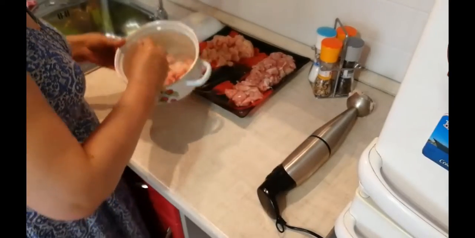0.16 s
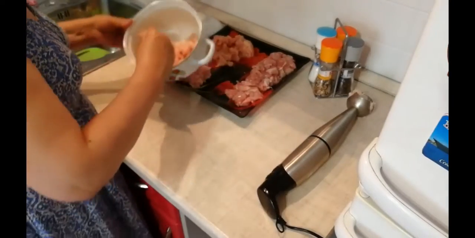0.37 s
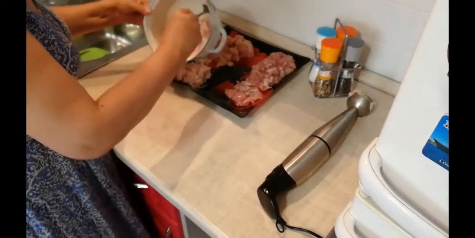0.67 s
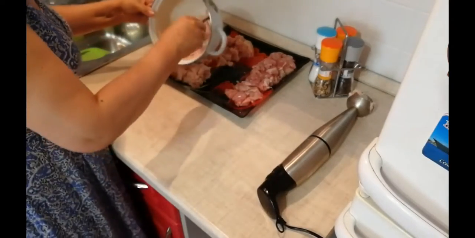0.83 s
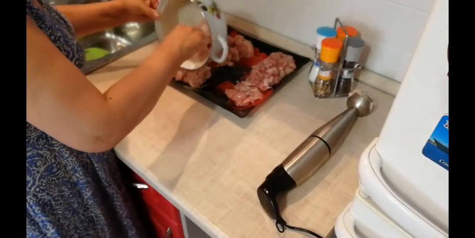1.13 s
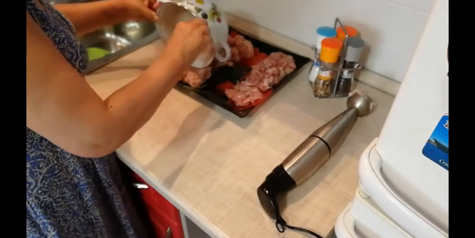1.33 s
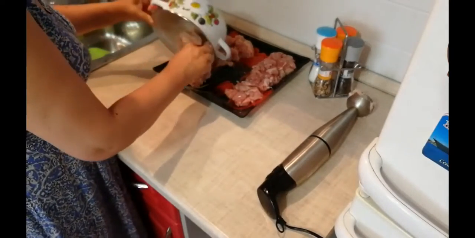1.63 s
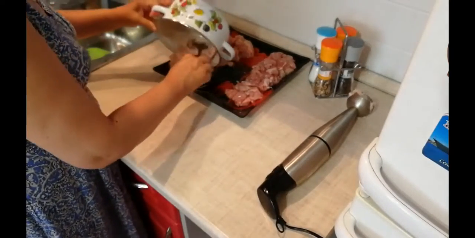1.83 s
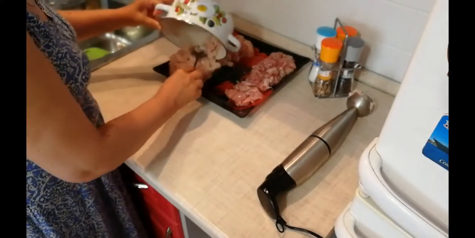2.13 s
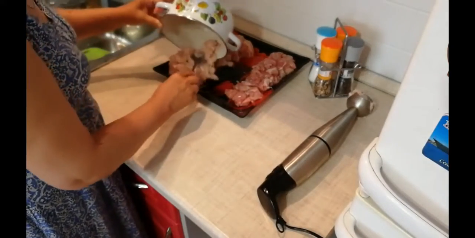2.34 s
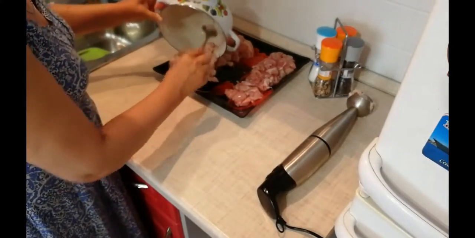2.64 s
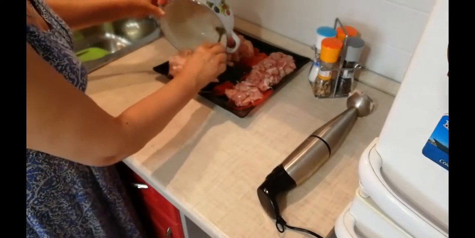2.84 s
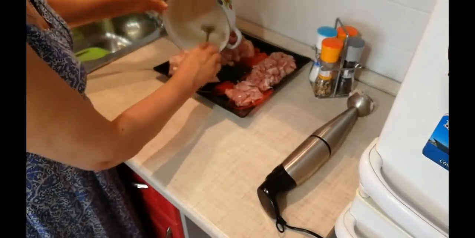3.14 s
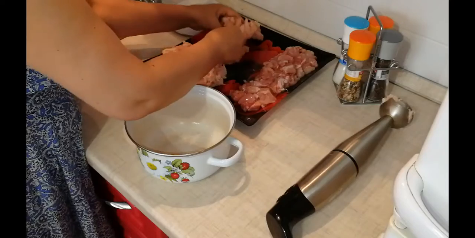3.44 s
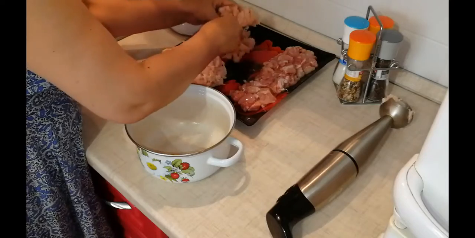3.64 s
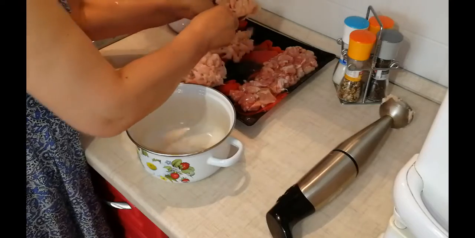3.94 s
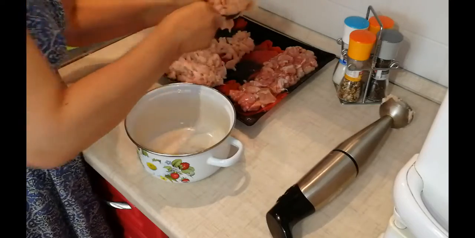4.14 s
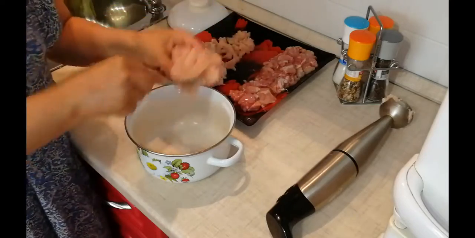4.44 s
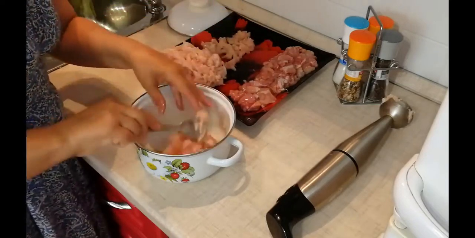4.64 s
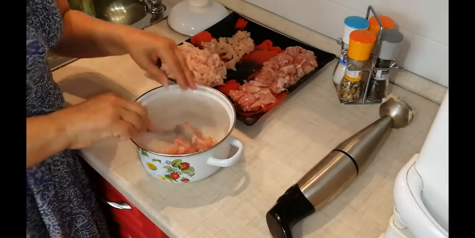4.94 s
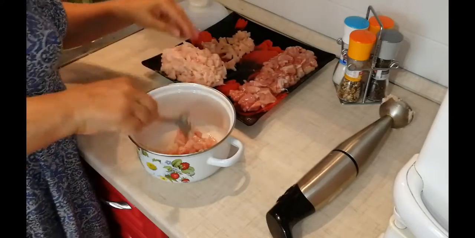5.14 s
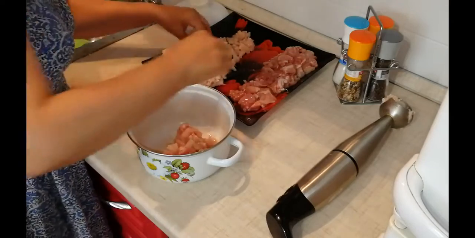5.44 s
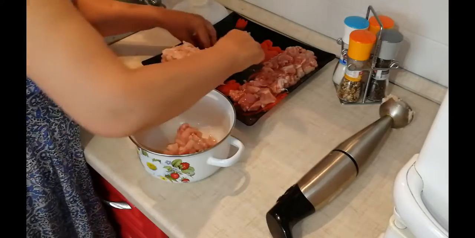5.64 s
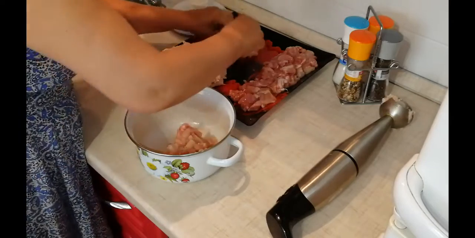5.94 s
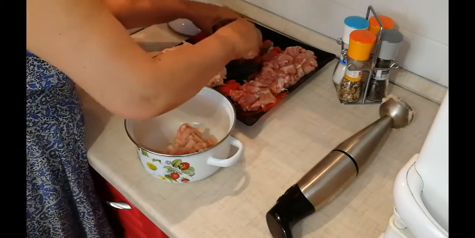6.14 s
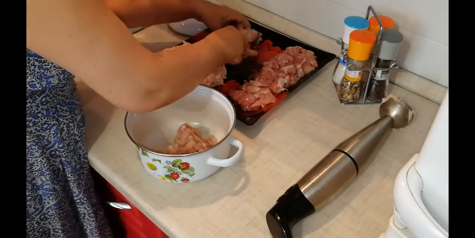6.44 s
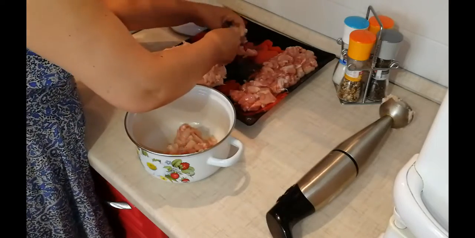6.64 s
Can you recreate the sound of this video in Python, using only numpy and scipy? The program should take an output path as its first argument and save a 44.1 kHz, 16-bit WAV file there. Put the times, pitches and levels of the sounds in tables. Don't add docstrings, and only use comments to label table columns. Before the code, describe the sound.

A spoon knocks sharply on an enamel pot and scrapes out sticky minced meat; after a brief silence, soft wet peeling and tray taps follow.

```python
import sys
import numpy as np
from scipy import signal
from scipy.fft import rfft, irfft, next_fast_len
from scipy.io import wavfile
from scipy.ndimage import uniform_filter1d

SR = 44100
rng = np.random.default_rng(int(sys.argv[2]) if len(sys.argv) > 2 else 0)


def natural_amplitude(level_db):
    exponent = np.asarray(level_db, float) / 20
    return 10 ** exponent


def digitize_waveform(pressure):
    field = np.atleast_2d(pressure).T
    bounded = np.clip(field, -1, 1)
    quanta = np.round(bounded * 32767).astype(np.int16)
    wavfile.write(sys.argv[1], SR, quanta)


N = 299439

SILENCE_S = 3.3415, 3.6065

# t/s, peak level/dB, crack length/ms, room share/dB, snap share/dB, snap pitch f/Hz
SPOON_BLOWS = [
    (0.22, -8, 2.6, -5, -38, 3430),
    (0.77, 4, 1.44, -1.5, -7, 7350),
    (1.464, 4, 1.03, -2.5, -5.5, 7730),
    (2.853, 3, 4.1, -5, -31, 9100),
    (4.7269, -18, 9.3, -3, -7, 9700),
    (4.74, -10.5, 5.8, -7.5, -36, 9720),
    (5.832, 7.5, 1.66, -6, -17, 2890),
    (6.3696, 0, 2.3, -7, -32, 3300),
]


def evened(x):
    return x / np.sqrt(np.mean(x ** 2) + 1e-20)


def read(points, hz):
    f, value = np.transpose(points)
    return np.interp(np.log(hz + 1), np.log(f + 1), value)


def add(mix, s, sound):
    part = mix[..., round(s * SR):][..., :sound.shape[-1]]
    part += sound[..., :part.shape[-1]]


def colour(x, tone, rings=(), ring_db=0, damping=1):
    taps = 4096
    hz = np.fft.rfftfreq(taps * 2, 1 / SR)
    peaks = 0
    for f, width, db in rings:
        below = np.minimum(hz / f, 1) ** 2
        peaks = peaks + natural_amplitude(db + ring_db) * below / (1 + (2 * (hz - f) / (width * damping)) ** 2)
    cepstrum = irfft(np.log(natural_amplitude(read(tone, hz)) + peaks + 1e-5))
    cepstrum[1:taps] *= 2
    cepstrum[taps + 1:] = 0
    return signal.oaconvolve(x, irfft(np.exp(rfft(cepstrum)))[:taps])


def resonate(x, hz, width):
    turn = np.exp(2j * np.pi * np.cumsum(hz * np.ones(len(x))) / SR)
    r = np.exp(-np.pi * width / SR)
    return 2 * (turn * signal.lfilter([1 - r], [1, -r], x / turn + 1e-18)).real


def resonate_twice(x, hz, width):
    return resonate(resonate(x, hz, width), hz, width)


def gritty(count, grain_db, lump_db):
    slips = rng.standard_normal(count) * natural_amplitude(grain_db * np.minimum(rng.exponential(1, count), 5))
    lumps = evened(uniform_filter1d(rng.standard_normal(count), size=300))
    return evened(slips * natural_amplitude(lump_db * lumps))


def gesture(s, hold, rise_db_per_s, fall_db_per_s):
    lead = 40 / rise_db_per_s
    t = np.arange(-lead, hold + 40 / fall_db_per_s, 1 / SR)
    return s - lead, natural_amplitude(rise_db_per_s * np.minimum(t, 0) - fall_db_per_s * np.maximum(t - hold, 0))


def patchy(x, patch_db):
    z = signal.stft(x, nperseg=256)[2]
    patches = uniform_filter1d(rng.standard_normal(z.shape), size=5, axis=0)
    patches = uniform_filter1d(patches, size=7, axis=1)
    return signal.istft(z * natural_amplitude(patch_db * evened(patches)), nperseg=256)[1][:N]


def alike(pair, same):
    size = next_fast_len(pair.shape[1])
    c = np.clip(read(same, np.fft.rfftfreq(size, 1 / SR)), -.99, .99)
    a, b = rfft(pair, size)
    up, down = np.sqrt((1 + c) / 2), np.sqrt((1 - c) / 2)
    return irfft(np.array([up * a + down * b, up * a - down * b]), size)[:, :pair.shape[1]]


def paths():
    # f/Hz, t60/s
    kitchen_t60 = [(250, 0.31), (660, 0.42), (1740, 0.34), (4590, 0.41), (12100, 0.31)]
    # f/Hz, likeness [-1..1]
    ear_likeness = [(200, 0.22), (700, 0.13), (1500, 0.41), (3000, 0.097), (6000, 0.087), (14000, 0.93)]
    echo_db, echo_rise_s = -4.5, .009

    near = np.zeros((2, 600))
    near[[0, 1], [0, 17]] = 1
    at = np.geomspace(40, 550, 7).astype(int) + rng.integers(0, 40, (2, 7))
    echoes = rng.choice([-1., 1.], at.shape) * natural_amplitude(echo_db - 700 * at / SR)
    np.put_along_axis(near, at, echoes, 1)

    hz, t, z = signal.stft(rng.standard_normal((2, SR // 2)), SR, nperseg=256)
    decay = natural_amplitude(-60 * t / read(kitchen_t60, hz)[:, None])
    tail = signal.istft(z * decay, SR, nperseg=256)[1]
    tail *= np.clip(np.arange(tail.shape[1]) / (echo_rise_s * SR), 0, 1)
    return [alike(p / np.linalg.norm(p[0]), ear_likeness) for p in (near, tail)]


def hum():
    # f/Hz, level/dB per Hz
    hum_tones = [
        [(12, -40.5), (33, 1.5), (65, -11.5), (111, -8), (156, -5.5), (224, -11.5), (599, -22), (1020, -17.5),
         (2370, -21.5), (3330, -19.5), (6170, -21), (8890, -22), (10200, -23), (14300, -24), (16500, -80)],
        [(12, -33.5), (20, 4), (71, -10), (121, -5), (189, -12.5), (224, -8.5), (297, -13.5), (535, -23),
         (994, -17), (2370, -23), (9150, -26), (9950, -26.5), (12800, -26), (15200, -32), (16500, -81)],
    ]
    hum_levels = [-58.5, -57]
    # f/Hz, likeness [-1..1]
    hum_likeness = [(60, .97), (180, .86), (350, .45), (600, -.1), (950, -0.18), (2380, -0.09), (5980, 0),
                    (15000, -0.3)]
    out, cut = np.zeros((2, N)), round(np.mean(SILENCE_S) * SR)
    for tone, db, part in zip(hum_tones, hum_levels, (slice(0, cut), slice(cut, N))):
        noise = np.array([colour(rng.standard_normal(N), tone)[part] for _ in "LR"])
        out[:, part] = natural_amplitude(db + 0.5) * evened(noise)
    drift = evened(uniform_filter1d(rng.standard_normal(N), size=6000))
    return alike(out, hum_likeness) * natural_amplitude(0.2 * drift)


def drones():
    # f/Hz, width/Hz, rms level/dB
    fridge_tones = [(36, 23, -73.5), (97.36, 4.9, -70), (234, 12, -77.5), (294, 5.1, -79),
                    (12700, 80, -83.5)]
    # t/s, hold/s, level/dB, f/Hz
    far_motor = [
        (3.71, 0.31, -62.5, 184.4),
        (4.22, 0.15, -63, 186.4),
    ]
    out = np.zeros(N)
    for f, width, db in fridge_tones:
        out += natural_amplitude(db) * evened(resonate_twice(rng.standard_normal(N), f, width))
    air = rng.standard_normal(N)
    for s, hold, db, hz in far_motor:
        start, gain = gesture(s, hold, 210, 106)
        tone = evened(resonate(resonate(air, hz, 7.0), hz, 7.5))
        add(out, start, natural_amplitude(db) * gain * tone[round(start * SR):][:len(gain)])
    return out


def pops(rows, cycles, width, gain_db):
    out, t = np.zeros(N), np.arange(SR // 30) / SR
    for s, db, hz in rows:
        puff = rng.standard_normal(len(t)) * np.exp(-t * hz / cycles)
        pop = resonate_twice(puff, hz, width * hz)
        add(out, s, natural_amplitude(db + gain_db) * pop / abs(pop).max())
    return out


def sticky_ticks():
    # t/s, peak level/dB, f/Hz
    tick_rows = [(0.0845, -49, 8450), (0.217, -7, 9200), (0.5077, -33, 9150), (1.261, -36.5, 9300),
                 (1.2875, -28, 8780), (1.291, -25, 9120), (1.3143, -29.5, 8660), (1.3572, -43, 8490),
                 (1.3686, -31.5, 9050), (1.373, -35, 9300), (1.3957, -39, 7250), (1.6557, -25, 8800),
                 (2.0222, -40, 6200), (2.3287, -49, 8500), (2.4159, -48, 8370), (2.6869, -30, 8000),
                 (3.0074, -16, 8800), (3.042, -30, 8400), (3.2493, -36, 8650), (3.8965, -41, 9500),
                 (4.138, -44, 9250), (2.57, -56.5, 4500)]
    return pops(tick_rows, cycles=14.0, width=.24, gain_db=0.67)


def blows():
    # f/Hz, level/dB per Hz
    pot_tones = [
        [(200, -30), (373, -4.5), (579, -33), (763, -7), (1140, -43), (1400, 5.5), (1840, -23), (9930, -11)],
        [(200, -23), (373, -7), (519, -43), (683, -21.5), (950, -28), (1480, 0.5), (1910, -17), (9930, -9.5)],
        [(200, -53), (400, -33), (690, -5), (1000, -26.5), (1400, -7), (1870, -15.5), (5330, -20), (10500, -18)],
        [(200, -27), (311, -14), (509, -40.5), (735, -37), (1250, -5.5), (1480, -2.5), (1810, -19.5),
         (8740, -4)],
    ]
    # f/Hz, level/dB per Hz
    tray_tones = [
        [(200, -39.5), (836, -9.5), (1530, -13.5), (3490, -19.5), (4200, -7), (6880, -11), (9580, -9)],
        [(200, 3), (316, -42), (456, -47), (883, -15), (1350, -6.5), (2750, -13), (9060, 2.5), (14100, -6)],
        [(200, -21.5), (387, -6.5), (500, -21.5), (569, -10), (1100, -1), (1740, -2.5), (3690, -4.5),
         (9930, -13)],
        [(200, -7), (316, -5.5), (360, -25.5), (601, 0), (1420, 0), (1980, -6), (3130, -1), (6400, -3)],
    ]
    # f/Hz, width/Hz, level/dB
    pot_modes = [
        [(795, 55, -4), (1500, 28, -13), (2140, 79, -13.5), (3160, 44, -6), (3300, 75, 3), (4190, 97, -19),
         (5440, 92, 3), (6730, 89, -2), (6840, 77, -6), (6820, 46, -23), (8050, 79, -0.5), (8560, 90, -19),
         (9900, 120, -19), (11400, 90, -11)],
        [(749, 120, -6.5), (1520, 50, -9), (2154, 65, 2), (2880, 36, -16), (3490, 60, -4.5), (4300, 120, -16),
         (4960, 40, -1), (5630, 62, 1), (6350, 190, -4.5), (8200, 46, -15.5), (8490, 34, -12), (8870, 40, 0.5),
         (10330, 64, 2), (10900, 52, -13.5)],
        [(639, 140, -5.5), (790, 150, 0), (1110, 42, -15.5), (1450, 100, -3), (2350, 63, -17.5),
         (2890, 28, -6.5), (3940, 150, -11), (4660, 60, -16.5), (6640, 65, -10.5), (6894, 250, -11),
         (8330, 150, -11), (9300, 46, -12.5), (10550, 100, -19), (10900, 110, -15)],
        [(760, 71, -3), (1479, 32, 7.5), (2260, 110, -9.5), (2990, 82, -3.5), (3620, 98, -2), (4300, 50, -9),
         (4770, 110, -5), (6160, 64, -17), (6800, 66, -3.5), (6870, 88.8, -11.5), (8140, 22, -15.5),
         (8800, 59, -6), (9150, 82, -10), (10330, 110, -3.5)],
    ]
    # f/Hz, width/Hz, level/dB
    tray_modes = [
        [(893, 67, -8), (8970, 220, 6.5)],
        [(1280, 68, -9), (5440, 250, 6), (6140, 370, -3), (9720, 44, 10)],
        [(1145, 31, -7), (1385, 110, -4), (1770, 32, -9), (2210, 100, -5.5), (2540, 49, -1), (2770, 41, 0),
         (3200, 79, -18.5), (3740, 190, -3), (5110, 100, -14.5), (6500, 130, -8.5), (8200, 89, -10),
         (8640, 110, -9)],
        [(930, 59, -1.5), (1470, 60, -3), (2540, 28, -1), (3200, 340, 1), (4520, 160, -14), (5000, 54, -20),
         (6270, 55, 1), (6950, 39, 0), (7700, 52, -11), (8350, 56, -4.5), (9630, 150, -2)],
    ]
    bass_hz, bass_db, top_hz, top_db = 95, -33.5, 17100, -16
    blur_hz = 3000
    hand_damping, hand_hold_s = 1.4, .012
    crack_rise_s = .0006
    swell_s, swell_db = .007, -48

    out, t = np.zeros((2, N)), np.arange(SR // 40) / SR
    rows = zip(SPOON_BLOWS, pot_tones + tray_tones, pot_modes + tray_modes)
    for (s, db, crack_ms, room_db, snap_db, snap_hz), tone, rings in rows:
        tone = [(bass_hz, tone[0][1] + bass_db), *tone, (top_hz, tone[-1][1] + top_db)]
        near, tail = paths()
        crack = rng.standard_normal(len(t)) * np.exp(-t / (crack_ms * 0.0014))
        crack *= np.clip(t / crack_rise_s, 0, 1)
        lumps = np.sqrt(uniform_filter1d(abs(rfft(crack)) ** 2, size=3))
        crack = irfft(rfft(crack) / lumps, len(t))

        ring = colour(crack, tone, rings, ring_db=7.0, damping=hand_damping)
        close = ring * np.exp(-np.arange(len(ring)) / (hand_hold_s * SR))
        close = close / abs(close).max()
        snap = resonate_twice(crack, snap_hz, 0.19 * snap_hz)
        snap = np.diff(snap, 2, prepend=[0, 0])
        add(close, 0, natural_amplitude(snap_db) * snap / abs(snap).max())
        add(out, s, natural_amplitude(db) * signal.fftconvolve(close[None], near, axes=1))

        lead = round(swell_s * SR)
        swell = evened(close[lead:0:-1]) * np.linspace(.3, 1, lead)
        add(out, s - swell_s, natural_amplitude(db + swell_db) * swell)

        blurred = []
        for f, width, mode_db in rings:
            blur = max(f / blur_hz, 1)
            blurred.append((f, width * blur, mode_db - 10 * np.log10(blur)))
        far = colour(crack, tone, blurred)
        add(out, s, natural_amplitude(db + room_db) * signal.fftconvolve(far[None] / abs(far).max(), tail, axes=1))
    return out


def smacks():
    # t/s, peak level/dB, f/Hz
    smack_rows = [(0.2245, -18, 3730), (1.0919, -35, 1240), (1.6807, -31, 3200), (2.0241, -55, 2540),
                  (2.1288, -50, 1200), (2.1831, -52, 1550), (2.687, -38, 4430), (3.25, -32, 4920),
                  (0.465, -38, 4300), (0.516, -43, 2600), (4.6054, -51.5, 1235), (4.6595, -42, 3670),
                  (4.943, -42, 1860), (4.886, -57, 1100), (4.961, -52, 2200), (4.779, -50, 900),
                  (4.907, -51, 700), (5.4943, -51, 1280), (5.5245, -51.5, 1570), (5.7313, -59.5, 1543),
                  (6.042, -30.5, 5700), (6.343, -44, 790), (6.351, -37, 760), (6.7345, -43, 3480),
                  (6.759, -36.5, 4300), (6.7793, -41, 1630)]
    return pops(smack_rows, cycles=3, width=.4, gain_db=1.3)


def glints():
    # t/s, hold/s, level/dB, f/Hz, glide/Hz per s
    glint_rows = [(0.25, 0.027, -45, 3300, -1200), (0.33, .03, -51, 2980, -600),
                  (0.25, 0.037, -43, 1390, -50), (0.33, 0.032, -37, 1405, 100), (0.36, .05, -55, 2120, 300),
                  (1.062, 0.028, -44, 2900, -300), (1.092, 0.0065, -31.5, 1386, -100),
                  (1.11, 0.024, -47, 3790, 100), (1.12, 0.017, -46, 2890, 100),
                  (2.895, 0.028, -34, 3700, 300), (2.995, 0.018, -48, 2170, -200),
                  (3.005, .012, -49, 3400, -100), (3.06, 0.011, -43, 3130, -600),
                  (3.086, .01, -40, 3350, -100), (3.113, .02, -39, 2640, 100),
                  (3.12, 0.023, -47, 3000, -400), (4.775, .012, -61, 904, -100),
                  (1.635, 0.016, -44, 592, -100)]
    width_hz = 90
    out = np.zeros(N)
    for s, hold, db, hz, glide in glint_rows:
        slips = rng.standard_normal(SR // 4)
        start, gain = gesture(s, hold, rise_db_per_s=1198.5, fall_db_per_s=900)
        hz = hz + glide * (np.arange(len(slips)) / SR + start - s)
        tone = evened(resonate_twice(slips, hz, width_hz))[:len(gain)]
        add(out, start, natural_amplitude(db) * gain[:len(tone)] * tone)
    return out


def scrapes():
    # t/s, hold/s, pressure/dB, air share/dB, air pitch f/Hz
    hold_strokes = [
        [(0.345, 0.014, -42, 0.5, 1363), (0.392, 0.0088, -38, -3, 1406), (0.47, 0.047, -54.5, -1, 1470)],
        [(1.035, 0.0063, -43, -11, 1350), (1.06, 0.016, -38.5, 1, 1343), (1.095, 0.055, -37, -7, 1349)],
        [(1.72, 0.023, -52.5, -5.5, 1530), (1.77, 0.09, -63, 2.5, 1570), (1.87, 0.099, -62, 2, 1616)],
        [(2.015, 0.042, -53, -13.5, 1470), (2.14, 0.069, -61.5, -12.5, 1520)],
        [(2.93, 0.056, -42, -13, 1273), (3.0, 0.0088, -38.5, -2, 1415)],
        [(3.056, 0.0072, -31.5, -2.5, 1450), (3.088, 0.011, -34, -6, 1500)],
        [(3.112, 0.027, -32, 1.5, 1495), (3.148, 0.013, -38, 1, 1504), (3.19, 0.028, -39, -16, 1490)],
        [(3.6, 0.075, -75.5, -3, 1557)],
    ]
    # lower air mode/dB, wall rattle/dB, lower over upper pitch [ratio], glide/Hz per s, air width/Hz
    pot_holds = [
        (-7.5, -5.5, .52, -150, 100),
        (-7, -3, 0.53, -200, 150),
        (-6.5, -1, 0.392, 700, 220),
        (-14.5, 4, 0.556, -300, 160),
        (-9.5, -0.5, .52, 94.5, 110),
        (-26, -9.5, 0.535, 300, 210),
        (-29, -5.5, 0.554, -100, 80),
        (14.5, -14, 0.547, 5, 125),
    ]
    # f/Hz, width/Hz, level/dB
    wall_modes = [
        [(2180, 58, -0.5), (2910, 64, -2.5), (3800, 120, -5)],
        [(2900, 170, -9.5), (3670, 60, -7), (4400, 47, -2), (6300, 45, -17)],
        [(1150, 60, -8), (2620, 81, -7), (5040, 34, 3.5), (6100, 100, 4)],
        [(1220, 53, 2), (2530, 56, 3), (3150, 51, -2), (6670, 39, 2)],
        [(2160, 40, 11.5), (3320, 71, -2.5), (3760, 36, -3), (4240, 40, -1)],
        [(2230, 37, -1), (3130, 110, 10), (3350, 74, 7), (4530, 45, -1)],
        [(2640, 130, 2.5), (2970, 170, 6.5), (3530, 46, -14), (4230, 67, -4)],
        [(3030, 70, -2.5)],
    ]
    # f/Hz, level/dB per Hz
    rasp_tone = [(2350, -40.5), (4000, -2), (5290, -8.5), (8910, 4.5), (11400, -6.5), (13900, -9.5),
                 (15700, -17), (16200, -22), (16500, -75.5)]
    wall_tone = [(1500, -45.5), (2000, -4.0), (4500, -3.0), (6000, -42.5)]  # f/Hz, level/dB per Hz

    out, slips = np.zeros(N), gritty(N, grain_db=3.0, lump_db=0.5)
    tilt = 1 + .025 * evened(uniform_filter1d(rng.standard_normal(N), size=900))
    rasp = evened(colour(slips, rasp_tone)[:N])
    for strokes, pot_hold, modes in zip(hold_strokes, pot_holds, wall_modes):
        lower_db, wall_db, lower_ratio, glide, width_hz = pot_hold
        walls = evened(colour(slips, wall_tone, modes, damping=1.6))
        for s, hold, db, air_db, hz in strokes:
            start, gain = gesture(s, hold, rise_db_per_s=548.5, fall_db_per_s=749.5)
            first = round(start * SR)
            part = slice(first, first + len(gain))
            hz = (hz + glide * (np.arange(len(gain)) / SR + start - s)) * tilt[part]
            upper = resonate_twice(slips[part], hz, width_hz)
            lower = resonate(resonate(slips[part], hz * lower_ratio, 120), hz * lower_ratio, 130)
            air = natural_amplitude(air_db) * evened(upper) + natural_amplitude(lower_db) * evened(lower)
            rattle = natural_amplitude(wall_db + .5 * air_db) * walls[part]
            add(out, start, natural_amplitude(db) * gain * (rasp[part] + air + rattle))
    return out


def clicks():
    # t/s, peak level/dB, f/Hz
    click_rows = [(0.511, -40, 11000), (1.261, -39, 8970), (3.252, -40, 5000), (4.732, -32, 2500),
                  (4.7415, -33, 6000), (4.944, -48, 1980), (4.947, -43, 2400), (4.952, -45, 2080),
                  (4.962, -41, 2500), (4.976, -41, 1700), (5.007, -49, 2800), (6.305, -48, 4500),
                  (6.611, -46, 2970), (4.899, -45, 190), (4.906, -45, 260)]
    out, impulse = np.zeros(N), np.eye(1, 900)[0]
    for s, db, hz in click_rows:
        click = -resonate_twice(impulse, hz, 1.2 * hz)
        add(out, s, natural_amplitude(db) * click / abs(click).max())
    return out


def peels():
    # t/s, hold/s, hiss level/dB, squelch share/dB
    peel_rows = [(1.3, 0.012, -50.5, -8), (1.378, 0.012, -53, -28), (2.689, 0.0066, -54.5, -11.5),
                 (3.899, 0.011, -63, -23), (3.95, 0.044, -53, -26), (4.15, 0.1, -45.5, -16.5),
                 (4.253, 0.082, -50, -14), (4.4, 0.057, -63.5, -11.5), (4.754, 0.013, -49, -1.5),
                 (4.892, 0.052, -57, -9), (5.055, 0.07, -61.5, -6), (5.926, .03, -75, 7),
                 (6.02, 0.016, -56, -17), (6.47, 0.029, -53, -2), (6.591, 0.058, -57, 5.5),
                 (6.742, 0.034, -59, 2)]
    # f/Hz, level/dB per Hz
    hiss_tone = [(2350, -34), (4000, -21.5), (5850, -9), (6740, -12.5), (9230, 1.5), (10500, -6.5),
                 (15300, -14), (16200, -30), (16500, -51)]
    # f/Hz, level/dB per Hz
    squelch_tone = [(350, -41), (600, -5.5), (1000, -2), (1920, -8.5), (3200, 3.5), (7000, -9.5),
                    (9100, -39), (15400, -120)]
    hiss, squelch = np.zeros((2, N))
    for s, hold, db, squelch_db in peel_rows:
        start, gain = gesture(s, hold, rise_db_per_s=355, fall_db_per_s=259.5)
        add(hiss, start, natural_amplitude(2 * db) * gain ** 2)
        add(squelch, start, natural_amplitude(2 * (db + squelch_db)) * gain ** 2)
    tears = gritty(N, grain_db=3.0, lump_db=1.0)
    fine = np.sqrt(hiss) * evened(colour(tears, hiss_tone)[:N])
    return fine + np.sqrt(squelch) * evened(colour(tears, squelch_tone)[:N])


def thuds():
    # t/s, peak level/dB, f/Hz
    thud_rows = [
        (3.608, -50, 266),
        (3.629, -47, 282.6),
        (4.224, -55, 245),
        (4.799, -55, 189.5),
        (5.885, -52, 180),
        (6.304, -38.5, 2800),
    ]
    return pops(thud_rows, cycles=3.8, width=3.3, gain_db=0.49)


def shaded(pair):
    # f/Hz, level/dB, left over right/dB
    treble_shade = [(3040, 0.9, 0.6), (4830, -0.17, 3), (5400, -6.5, 7.5), (6000, 0, 2), (8000, -2.37, 4.5),
                    (11800, 1, -2.2)]
    out = []
    for x, side in zip(pair, (1, -1)):
        tone = [(f, db + side * lean_db / 2) for f, db, lean_db in treble_shade]
        out.append(colour(x, tone)[:N])
    return np.array(out)


def hush(quiet):
    hush_s, hush_db = .014, -20.0
    gain_db = np.zeros(N)
    for s, *_ in SPOON_BLOWS[:1] + SPOON_BLOWS[2:4] + SPOON_BLOWS[6:]:
        add(gain_db, s - hush_s - .005, np.full(round(hush_s * SR), hush_db))
    bass = signal.sosfiltfilt(signal.butter(2, 600, fs=SR, output="sos"), quiet)
    treble = (quiet - bass) * natural_amplitude(uniform_filter1d(gain_db, size=90))
    band = signal.sosfiltfilt(signal.butter(3, (300, 460), "bandpass", fs=SR, output="sos"), quiet)
    t = np.arange(N) / SR
    masked = uniform_filter1d(1. * (t > 3.06) * (t < 3.19), size=3000)
    return bass + treble - masked * band


def scene():
    near, tail = paths()
    room = hum() + drones()
    hits, ticks = blows(), clicks()
    soft = sticky_ticks() + smacks() + glints() + thuds()
    soft += patchy(scrapes(), patch_db=3.5)
    soft += patchy(peels(), patch_db=-1.0)
    heard = signal.fftconvolve(soft[None], near, axes=1)[:, :N] + ticks
    heard += natural_amplitude(-7.5) * signal.fftconvolve((soft + ticks)[None], tail, axes=1)[:, :N]
    return shaded(hits) + hush(shaded(heard) + room)


def dropped(pair):
    # from t/s, to t/s, low f/Hz, high f/Hz
    silent_bands = [(.245, .295, 4700, 4930), (.345, .39, 4670, 4840), (.29, .33, 3600, 3740),
                    (1.11, 1.13, 5250, 5450), (1.15, 1.185, 2360, 2520), (1.13, 1.16, 4850, 5050),
                    (1.49, 1.62, 5300, 5600), (2.87, 2.895, 5170, 5450), (2.925, 3.0, 5080, 5240),
                    (2.975, 2.995, 5400, 5600), (3.03, 3.225, 5080, 5280), (3.06, 3.085, 4050, 4520),
                    (3.065, 3.105, 6230, 6470)]
    out = pair.copy()
    for t0, t1, lo, hi in silent_bands:
        part = slice(round(t0 * SR) - 500, round(t1 * SR) + 500)
        sos = signal.butter(4, (lo, hi), "bandpass", fs=SR, output="sos")
        band = signal.sosfiltfilt(sos, pair[:, part])
        out[:, part] -= band * signal.windows.tukey(band.shape[1], 1000 / band.shape[1])
    return out


def top_cut(x):
    return signal.sosfilt(signal.butter(12, 17010, fs=SR, output="sos"), x)


def record(dry):
    # f/Hz, level/dB
    port_lean = [(60, -1), (160, -0.5), (270, 1), (450, -2), (740, 2.5), (1220, 1), (2010, -0.5),
                 (5500, -0.5), (9080, 7.5), (15000, -8)]
    squeeze_db, recover_db_per_s = -32.5, 130
    ports = []
    for x, side in zip(dry, (1, -1)):
        ports.append(colour(x, [(f, side * db / 2) for f, db in port_lean])[:N])
    ports = np.array(ports)

    power = signal.lfilter([.004], [1, -.996], (ports ** 2).mean(0))
    power_db = 10 * np.log10(power + 1e-12)
    fall = np.arange(N) * recover_db_per_s / SR
    held_db = np.maximum.accumulate(power_db + fall) - fall
    over_db = np.maximum(held_db - squeeze_db, 0)
    squeezed = np.clip(dropped(ports) / natural_amplitude(0.22 * over_db), -1, 1)

    t = np.arange(N) / SR
    kept = squeezed * ((t < SILENCE_S[0]) | (t > SILENCE_S[1]))
    kept = signal.oaconvolve(kept, signal.firwin(255, 16300, fs=SR)[None], "same")
    return top_cut(kept)


dry = scene()
out = record(dry)
digitize_waveform(out)
```